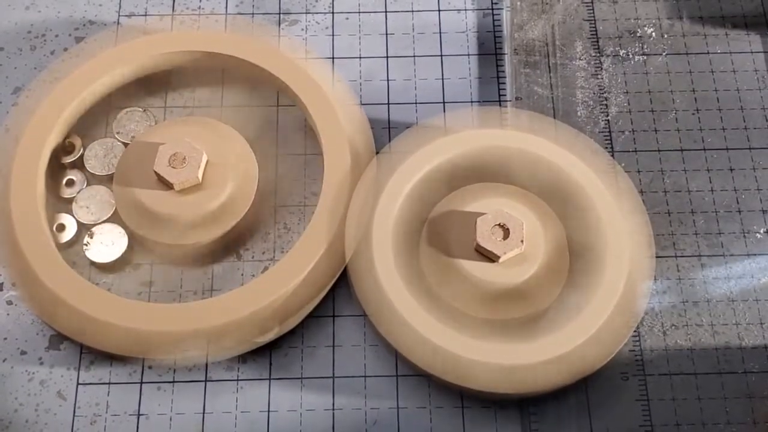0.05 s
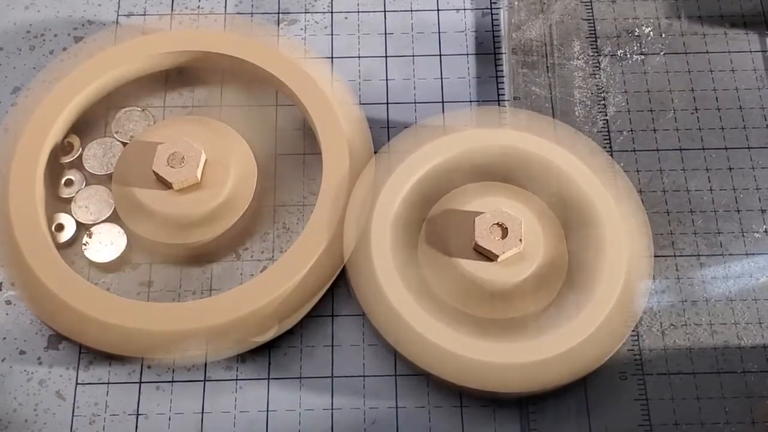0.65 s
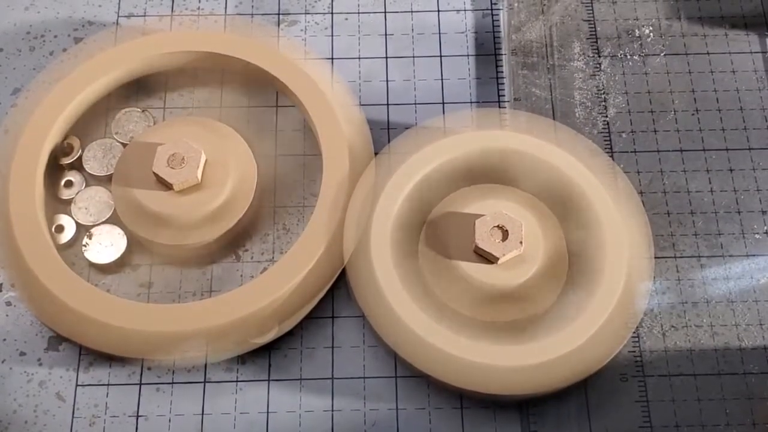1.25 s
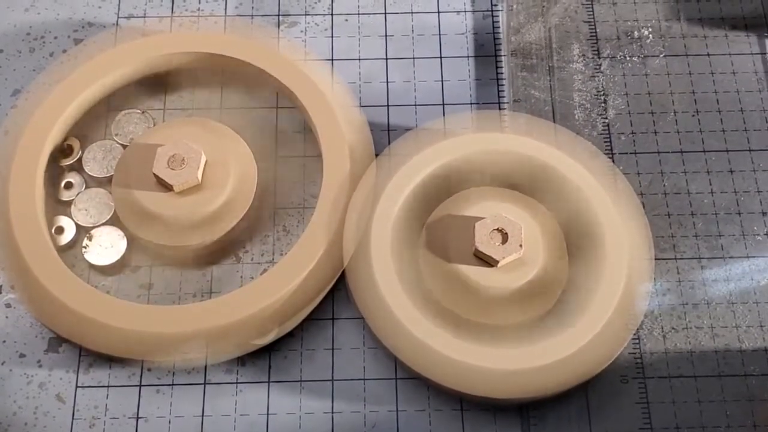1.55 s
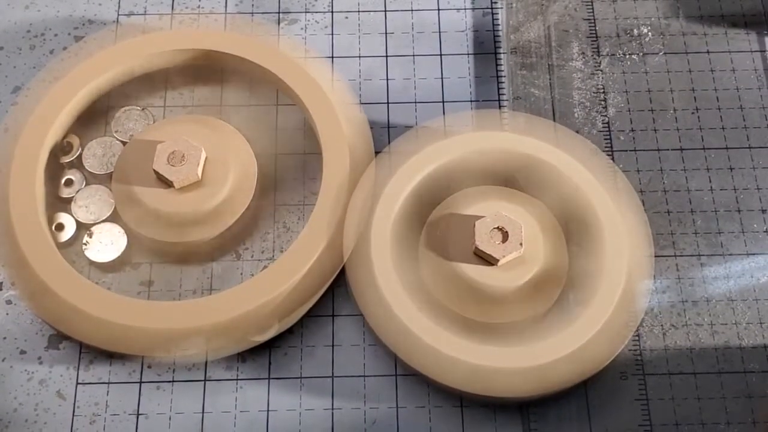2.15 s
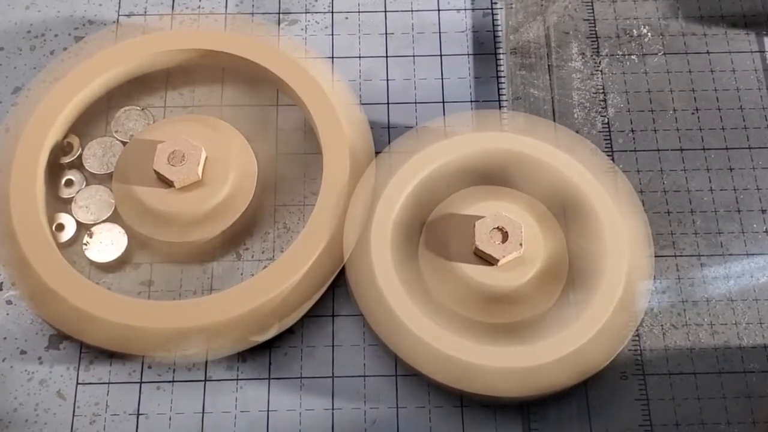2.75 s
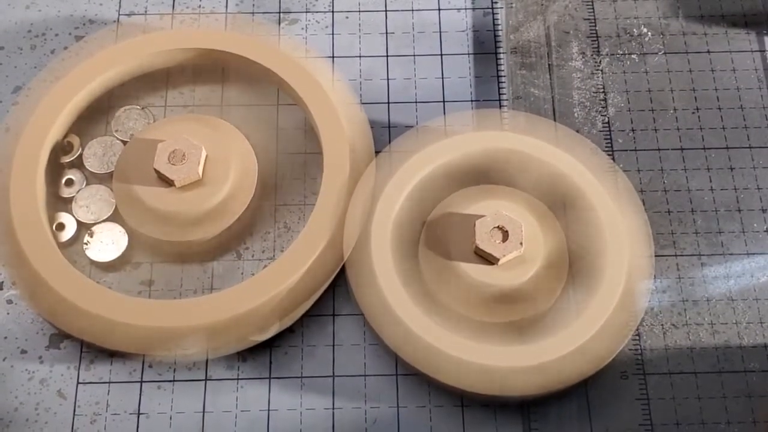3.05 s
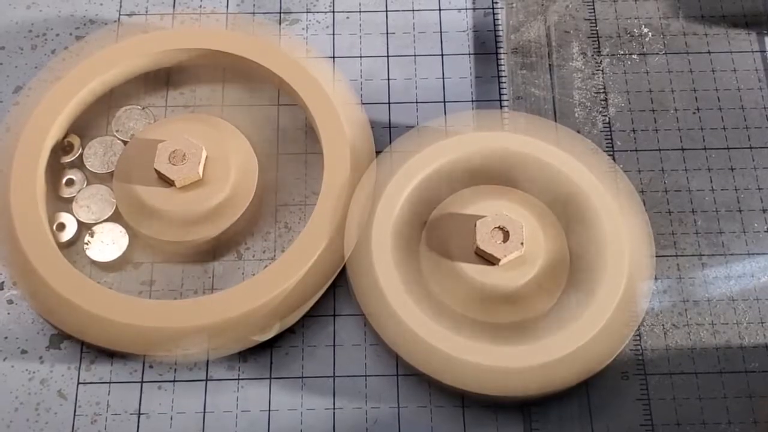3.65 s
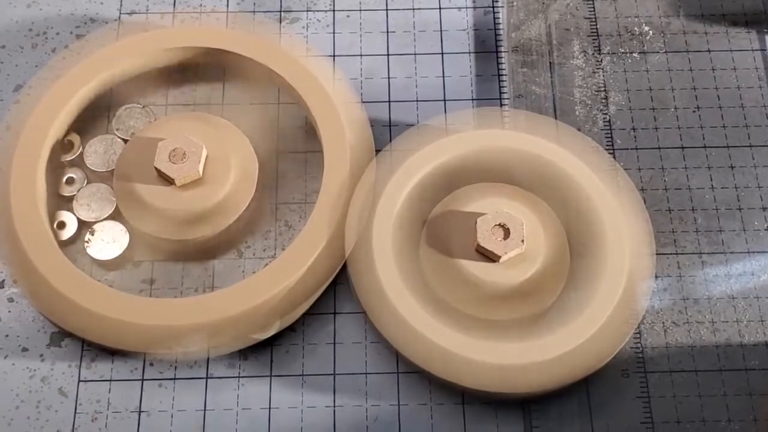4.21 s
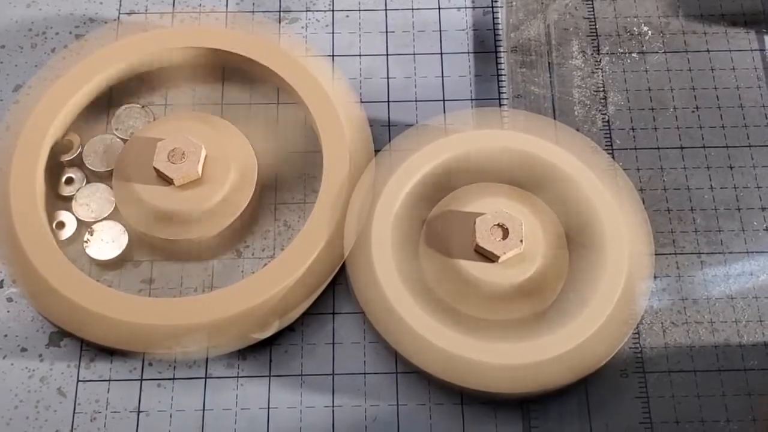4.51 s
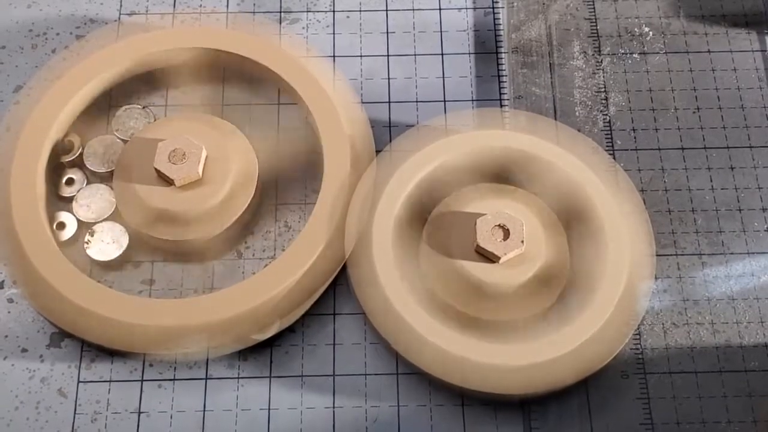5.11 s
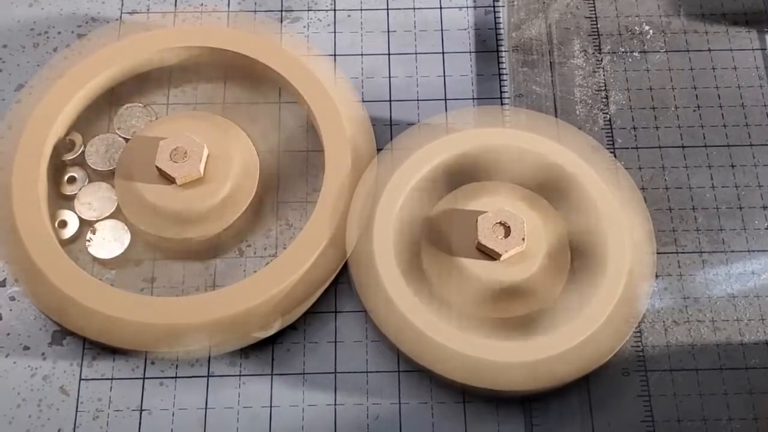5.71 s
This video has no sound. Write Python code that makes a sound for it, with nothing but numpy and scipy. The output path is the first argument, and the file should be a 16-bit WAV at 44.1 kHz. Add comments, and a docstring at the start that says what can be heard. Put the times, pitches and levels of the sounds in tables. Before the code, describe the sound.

Close to a workbench in a quiet workshop, compressed air blows on a pair of wooden gears, making a bright hiss and a whine that creeps up in pitch, with occasional taps. The air stops abruptly, ending both hiss and whine. The loose teeth keep rattling unevenly, lightly at first, then with harder, duller knocks and a rumble from the axles as the wheels slow and wobble.

```python
"""On a workbench, a jet of compressed air drives two meshed wooden gears. The turbulent jet hisses,
and the teeth chop it, as in a siren, into a rising whine. The air is shut off and the gears coast.
Loose teeth knock and rattle across their play, each impact exciting the modes of wheels and bench;
the knocks grow harder and the axles rumble as the wheels slow and wobble on their bolts."""
import sys
import numpy as np
from scipy import signal
from scipy.fft import rfft, irfft
from scipy.io import wavfile
from scipy.ndimage import uniform_filter1d

SR = 44100
rng = np.random.default_rng(int(sys.argv[2]) if len(sys.argv) > 2 else 0)


def persist_wave(psi):
    """Save psi, clipped to +-1, as 16-bit WAV."""
    counts = np.round(np.clip(psi, -1, 1) * 32767).astype(np.int16)
    wavfile.write(sys.argv[1], SR, np.atleast_2d(counts).T)


N = 263276

# teeth knocking across their play: t/s, relative peak level/dB
TOOTH_IMPACTS = [(0.874, -17), (1.103, -18), (1.663, -21), (1.93, -14), (2.675, -18.5), (2.899, -17.5),
                 (3.338, -16), (3.442, -25.5), (3.503, -25.5), (3.533, -17), (3.69, -16.5), (3.707, -25),
                 (3.799, -21), (3.823, -26), (4.018, -19), (4.036, -17.5), (4.051, -15.5), (4.062, -19),
                 (4.144, -27), (4.165, -25), (4.243, -20), (4.271, -26.5), (4.296, -27.5), (4.32, -30.5),
                 (4.363, -24.5), (4.386, -19), (4.408, -20.5), (4.431, -23.5), (4.55, -35), (4.764, -23),
                 (4.782, -20.5), (4.831, -22), (4.87, -20.5), (4.883, -15.5), (4.92, -7), (4.973, -14.5),
                 (4.984, -18), (5.028, -3.5), (5.084, -13), (5.102, -22), (5.131, -11.5), (5.147, -4),
                 (5.282, -19), (5.317, -13.5), (5.349, -3.5), (5.376, -6.5), (5.433, -15), (5.45, -17.5),
                 (5.5, -20.5), (5.554, -8.5), (5.561, -10), (5.589, -7), (5.64, -5), (5.72, -29),
                 (5.772, -2), (5.837, -16.5), (5.879, -20.5), (5.943, -13), (5.956, -15)]
EDGES_HZ = np.geomspace(22, 19000, 27)
CENTRES_HZ = np.sqrt(EDGES_HZ[1:] * EDGES_HZ[:-1])
SHUT_OFF_S, WOBBLE_S = 3.355, 4.76   # the valve shuts; the slowed wheels start to wobble


def from_db(db):
    """Amplitude ratio of a level in decibels."""
    return 10 ** (np.asarray(db) / 20)


def unit_rms(x):
    """Normalisation to unit mean power."""
    return x / np.sqrt(np.mean(x ** 2) + 1e-20)


def at_hz(rows, hz):
    """Interpolation of each column on a logarithmic frequency axis."""
    points, *columns = np.transpose(rows)
    return [np.interp(np.log(hz + 1e-9), np.log(points), c) for c in columns]


def pan(db):
    """Left and right gains for an interchannel level difference."""
    return from_db(np.array([[.5], [-.5]]) * db)


def drift(rate):
    """Low-pass random process of unit spread, changing about rate times a second."""
    step, warm_up = 40, 2000
    pole = np.exp(-2 * np.pi * rate * step / SR)
    white = rng.standard_normal(N // step + warm_up + 2)
    slow = signal.lfilter([1], [1, -2 * pole, pole * pole], white)[warm_up:]
    return np.interp(np.arange(N) / step, np.arange(len(slow)), unit_rms(slow))


def stereo_pair(mid, side, correlation):
    """Sum and difference of independent noises give two channels of a set correlation."""
    return np.sqrt(1 + correlation) * mid + np.sqrt(1 - correlation) * side * np.array([[1], [-1]])


def steady_noise(spectrum, correlation, balance_db, lag_ms=0):
    """Spectral shaping of stereo noise, at unit rms, by three tables over frequency."""
    hz = np.arange(N // 2 + 1) * SR / N
    bins = stereo_pair(*rfft(rng.standard_normal((2, N))), at_hz(correlation, hz)[0])
    bins = bins * from_db(at_hz(spectrum, hz)[0]) * pan(at_hz(balance_db, hz)[0])
    bins[1] *= np.exp(-2j * np.pi * hz * lag_ms / 1000)
    return unit_rms(irfft(bins, N))


def resonance(x, hz, width_hz):
    """Damped oscillator: a two-pole band-pass with unit peak gain."""
    r = np.exp(-np.pi * width_hz / SR)
    feedback = [1, -2 * r * np.cos(2 * np.pi * hz / SR), r * r]
    return signal.lfilter(np.array([1, 0, -1]) * (1 - r * r) / 2, feedback, x)


def workshop_hush():
    """Stationary ambient noise, coherent between the channels at low frequencies."""
    spectrum = [(18, -38), (30, -6), (120, 0.5), (335, -7), (907, -45), (1120, 2), (1490, -5), (3640, -9.5),
                (12500, -19), (15800, -26)]   # f/Hz, relative spectral level/dB
    return from_db(-59) * steady_noise(spectrum, [(100, 0.95), (2000, .1)], [(100, 0)])


def axle_rumble(wander_db=6.0, bench_db=-11.5):
    """Friction of bores on bolts excites low modes; the wobble swells each and shakes the bench."""
    modes = [(348.3, 77, 8.5), (465, 51, 5.5), (501, 155, -4), (638, 81, -4.5)]   # wheels on their axles: f/Hz, bandwidth/Hz, relative level/dB
    bench = [(25, -20), (45, -11), (62, 9), (90, -5), (150, 0), (300, 4), (600, -24)]   # thud of the bench: f/Hz, relative spectral level/dB
    rub = stereo_pair(*rng.standard_normal((2, N)), 0.98)
    drone = 0
    for hz, width, db in modes:
        swell = from_db(db + wander_db * np.clip(drift(8.3), -2, 1.5))
        drone = drone + swell * resonance(resonance(rub, hz, width), hz, width)
    return unit_rms(drone) + from_db(bench_db) * steady_noise(bench, [(100, 0.95)], [(100, 0)])


def wood_response(room_t60=0.28, rise_s=0.00061, chatter_db=4.5, chatter_s=0.038):
    """Impulse response of a tooth contact: dense damped modes, main resonances and reverberation."""
    spectrum = [(50, -31.5), (130, -17.5), (290, -3), (600, -0.5), (1200, -1), (1800, -1.5), (2600, -2),
                (4200, -14.5), (5300, -16), (6600, 3), (8200, -26.5), (12000, -6.5), (16000, -50)]   # colour of a knock: f/Hz, relative spectral level/dB
    modes = [(375, 45, 3.5), (480, 75, 3.5), (646.5, 19.4, 11), (763, 62, -12), (888, 45, 9),
             (1150, 27, 3.5), (1262, 110, 6.5), (1324, 50, 9), (1343, 140, -40), (2162, 31, 6),
             (2475, 150, 8), (3394, 170, 6), (3770, 560, 8.5), (4390, 110, 13.5)]   # resonances and dips of wheels and bench: f/Hz, bandwidth/Hz, gain/dB
    correlation = [(60, 0.9), (330, 1), (650, 0.75), (1400, 0.23), (3000, 0.037)]   # f/Hz, left-right correlation
    damping = [(149, 0.098, -11), (393, 0.033, -18), (1170, 0.11, -11.5), (3080, 0.073, -19),
               (6500, 0.03, -19.5), (9000, 0.03, -21.5)]   # f/Hz, T60 of the wood/s, level of the workshop's echo/dB
    t = np.arange(SR // 3) / SR
    # the flanks bounce on each other, breaking the attack into tiny clicks
    chatter = from_db(chatter_db * np.clip(drift(850)[:len(t)], -2, 2) * np.exp(-t / chatter_s))
    attack = chatter * (1 - np.exp(-t / rise_s))
    bands = []
    for low, high, hz in zip(EDGES_HZ, EDGES_HZ[1:], CENTRES_HZ):
        t60, echo_db = at_hz(damping, hz)
        decay = np.hypot(from_db(-60 * t / t60), from_db(echo_db - 60 * t / room_t60))
        band = signal.butter(2, [low, high], "band", fs=SR, output="sos")
        mid, side = signal.sosfilt(band, rng.standard_normal((2, len(t))) * attack * decay)
        ring = stereo_pair(unit_rms(mid), unit_rms(side), at_hz(correlation, hz)[0])
        bands.append(unit_rms(ring) * np.sqrt(high - low) * from_db(at_hz(spectrum, hz)[0]))
    bands = np.array(bands)
    bands = bands + sum((from_db(db) - 1) * resonance(bands, hz, width) for hz, width, db in modes)
    onset = bands.sum(axis=0)[:, :SR // 100]
    return bands / np.sqrt(np.mean(onset ** 2))


def tooth_rattle(spots, per_s=200, spread_db=6.5, soft_hz=7000):
    """Shot noise: light, soft tooth contacts fall at random all round the rims."""
    out = 0
    for response in spots:
        clicks = (rng.random(N) < per_s / len(spots) / SR) * rng.choice([-1, 1], N)
        sizes = from_db(spread_db * np.clip(rng.standard_normal(N), -2, 2))
        out = out + signal.oaconvolve([clicks * sizes], response.sum(axis=0), axes=1)[:, :N]
    return unit_rms(signal.lfilter(*signal.butter(1, soft_hz, fs=SR), out))


def running_gain(flow, levels, settle_db_per_s=30):
    """Envelope: steady under the jet; a jump and decay at shut-off; a jump and growth in the wobble."""
    driven_db, freed_db, settled_db, wobble_db, growth_db_per_s = levels
    t = np.arange(N) / SR
    settling_db = np.maximum(freed_db - settle_db_per_s * np.maximum(t - SHUT_OFF_S, 0), settled_db)
    coasting_db = np.where(t < WOBBLE_S, settling_db, wobble_db + growth_db_per_s * (t - WOBBLE_S))
    return flow * from_db(driven_db) + (1 - flow) * uniform_filter1d(from_db(coasting_db), size=400)


def running_gears(spots, flow, rocking_db=-33.5, rocking_db_per_s=176):
    """Amplitude modulation of rumble and rattle; each knock rocks the wheels and swells the rumble."""
    # driven level/dB, at shut-off/dB, settled/dB, at the start of the wobble/dB, growth/(dB/s)
    rumble_levels = (-66, -45.5, -57.5, -46, 13.5)
    rattle_levels = (-40.5, -37, -58, -39, 0.5)
    t = np.arange(N) / SR
    rocking = sum((t > s) * from_db(peak_db + rocking_db - rocking_db_per_s * np.abs(t - s))
                  for s, peak_db in TOOTH_IMPACTS)
    rumble_gain = running_gain(flow, rumble_levels) + uniform_filter1d(rocking, size=200)
    return rumble_gain * axle_rumble() + running_gain(flow, rattle_levels) * tooth_rattle(spots)


def tooth_knocks(spots, level_db=-11.0, variety_db=2.0, rebound_s=.003):
    """Backlash: a tooth strikes, then rebounds on the opposite flank; harder contact is brighter."""
    length = spots[0].shape[-1]
    out = np.zeros((2, N + 2 * length))
    scatter_db = variety_db * rng.standard_normal((len(TOOTH_IMPACTS), len(CENTRES_HZ)))
    octaves = np.log2(np.clip(CENTRES_HZ, 300, 6500) / 1500)
    top_edge = np.clip(np.log2(CENTRES_HZ / 3500), 0, 1)
    for k, (s, peak_db) in enumerate(TOOTH_IMPACTS):
        coasted_s = max(s - SHUT_OFF_S, 0)   # as the wheels slow, the tilt falls and the top fades
        tilt_db_per_octave = 4 + 0.1429 * peak_db - 2.5 * coasted_s
        colour_db = tilt_db_per_octave * octaves - 0.6 * coasted_s * top_edge + scatter_db[k]
        gains = from_db(peak_db + level_db + colour_db)
        rebound_db = -2 + .2 * peak_db   # strong knocks spring back more
        for j, (delay_s, contact_db) in enumerate([(0, 0), (rebound_s, rebound_db)]):
            start = round((s + delay_s) * SR)
            contact = np.tensordot(gains, spots[(k + j) % len(spots)], 1)
            out[:, start:start + length] += from_db(contact_db) * contact
    return out[:, :N]


def air_flow(valve_db_per_s=700, hose_db=-16, hose_db_per_s=240):
    """Flow is 1 until shut-off, then decays exponentially: fast at the valve, slower from the hose."""
    shut_s = np.maximum(np.arange(N) / SR - SHUT_OFF_S, 0)
    return np.maximum(from_db(-valve_db_per_s * shut_s), from_db(hose_db - hose_db_per_s * shut_s))


def air_jet(flow, level_db=-20):
    """Turbulence radiates a fluttering broadband hiss; stray air buffets the left microphone."""
    hiss_spectrum = [(60, -22), (150, -10.5), (400, -7), (650, -4), (1200, -6.5), (2500, -4.5), (4000, -3),
                     (6400, 0), (7300, -5), (8400, -6.5), (9700, -1.5), (11500, -1), (13000, .5),
                     (15900, 1), (17000, -30)]   # f/Hz, relative spectral level/dB
    correlation = [(150, 0.16), (600, 0.06), (3000, 0.072), (8000, 0.32), (15000, 0.066)]   # f/Hz, left-right correlation
    balance = [(200, 14.5), (400, 10), (700, 4), (1300, 7), (2400, 4), (8000, 4), (15000, 8)]   # f/Hz, left minus right level/dB
    buffet_spectrum = [(20, -44), (45, -3.5), (80, 0.5), (110, -1.5), (150, -14), (300, -33), (600, -28)]   # f/Hz, relative spectral level/dB
    flutter = from_db(.6 * drift(25) + .3 * drift(3))
    hiss = steady_noise(hiss_spectrum, correlation, balance, lag_ms=0.171) * flutter
    buffet = steady_noise(buffet_spectrum, [(100, 0.004)], [(100, 23)])
    gusts = from_db(-20.5 + 2.4 * drift(12))
    return from_db(level_db) * flow * (hiss + buffet * gusts)


def siren_whine(flow, jitter=0.0007, waver_db=0.34, right_lag_s=.00017):
    """Siren principle: each tooth cuts the jet once; harmonics swell as they sweep past resonances."""
    speed = [(0.0, 782.8), (0.15, 798.1), (0.45, 816.0), (0.92, 830.9), (1.2, 839.7), (1.45, 859.7),
             (1.86, 882.6), (2.03, 877.7), (2.35, 896.4), (2.6, 903.4), (3.0, 904.3), (3.33, 915.8)]   # t/s, tooth-passing f/Hz
    # harmonic number, peak level/dB, left minus right/dB, tooth-passing f at the peak/Hz, half-width/Hz
    harmonics = [(1, -33, -3.3, 820, 69), (2, -42.5, 13.5, 866, 60), (3, -36, 2, 930, 170),
                 (4, -41.5, 10.5, 920, 180), (5, -34, -2, 734, 100), (6, -42, 19, 846, 21)]
    tooth_hz = np.interp(np.arange(N) / SR, *np.transpose(speed))
    phase = 2 * np.pi * np.cumsum(tooth_hz * (1 + jitter * drift(45))) / SR
    phase = phase - 2 * np.pi * tooth_hz * np.array([[0], [right_lag_s]])
    tone = 0
    for number, level_db, left_db, peak_hz, width_hz in harmonics:
        detuning = (tooth_hz - peak_hz) / width_hz
        gain = from_db(level_db + waver_db * drift(2.0)) / (1 + detuning ** 2)
        tone = tone + gain * pan(left_db) * np.sin(number * phase)
    return np.sqrt(2) * tone * flow


def scene():
    """Superposition of the workshop's hush, the jet, its whine and the gears."""
    flow = air_flow()
    spots = [wood_response() for _ in range(6)]   # places on the rims, each ringing a little differently
    hush = workshop_hush()
    return hush + air_jet(flow) + siren_whine(flow) + tooth_knocks(spots) + running_gears(spots, flow)


def record(dry, cutoff_hz=15800):
    """Clipping at full scale, then band-limiting by a steep low-pass."""
    low_pass = signal.ellip(12, .1, 80, cutoff_hz, fs=SR, output="sos")
    return signal.sosfilt(low_pass, np.clip(dry, -1, 1))


dry = scene()
out = record(dry)
persist_wave(out)
```